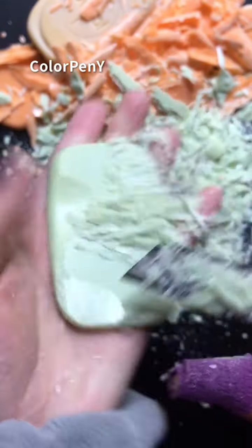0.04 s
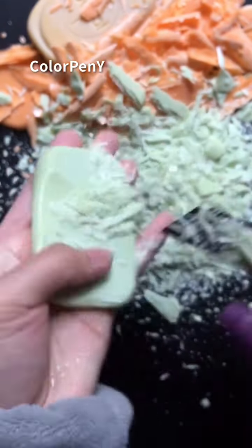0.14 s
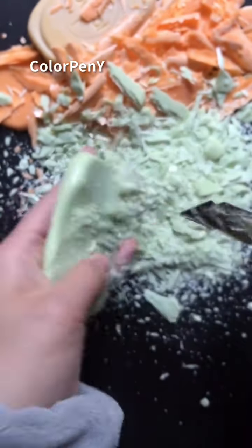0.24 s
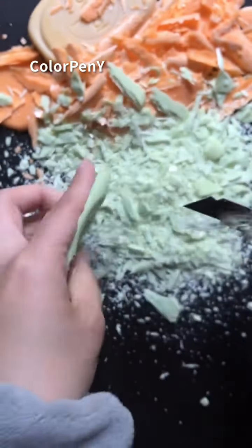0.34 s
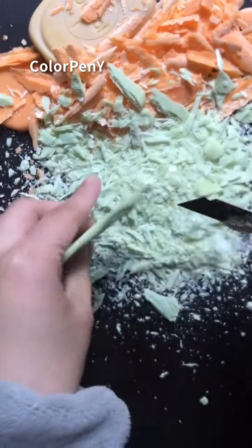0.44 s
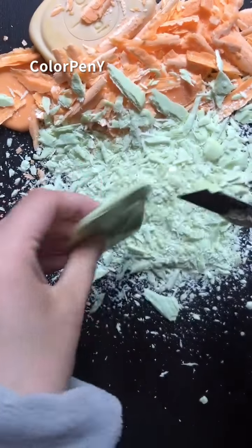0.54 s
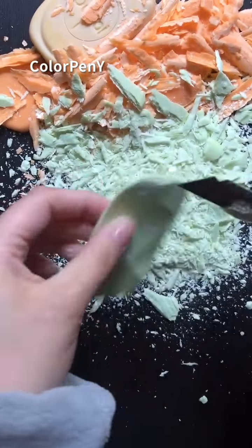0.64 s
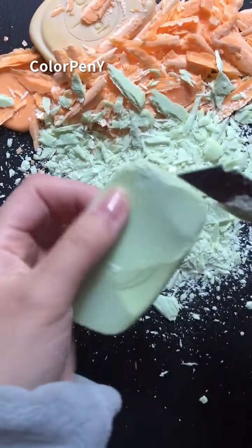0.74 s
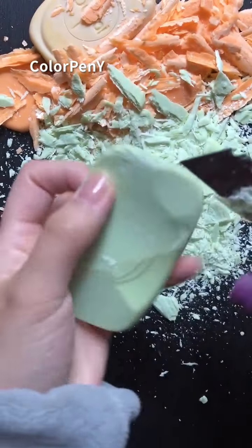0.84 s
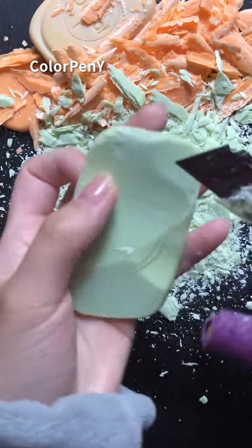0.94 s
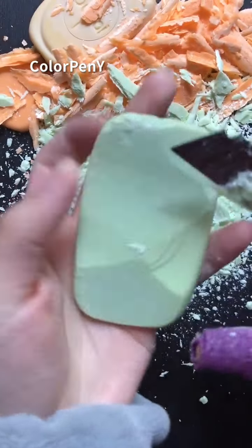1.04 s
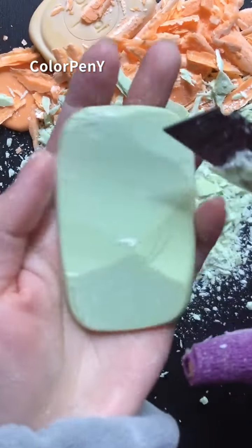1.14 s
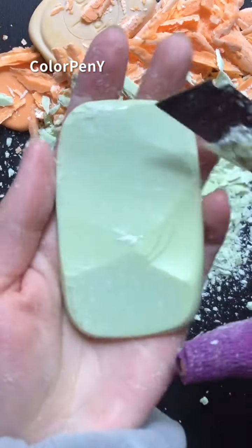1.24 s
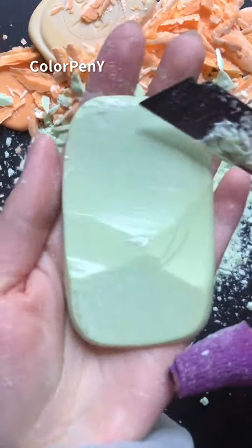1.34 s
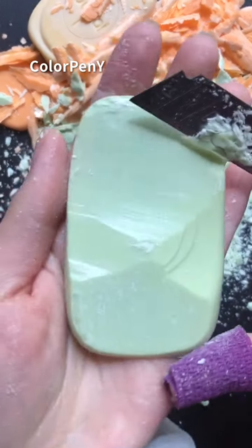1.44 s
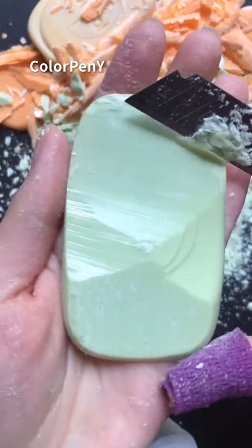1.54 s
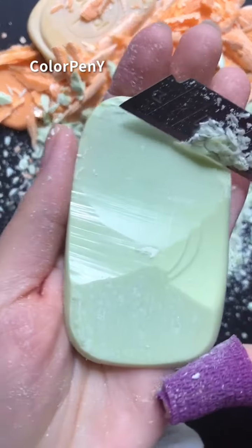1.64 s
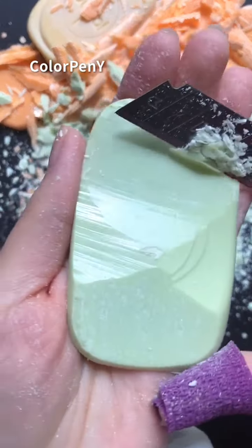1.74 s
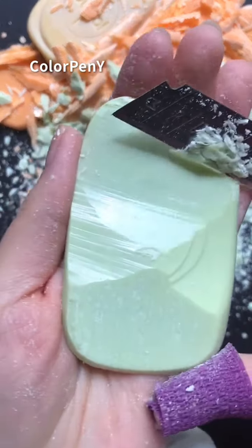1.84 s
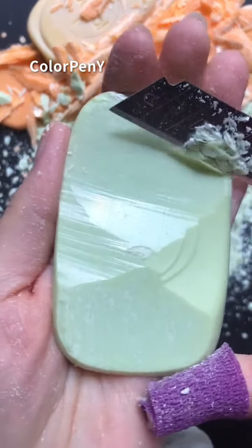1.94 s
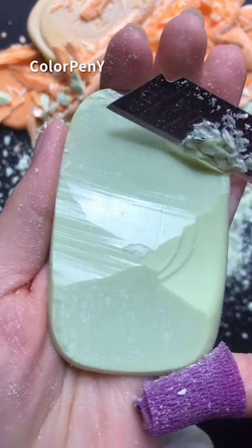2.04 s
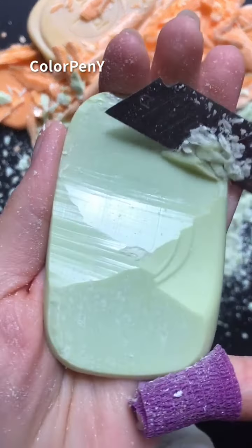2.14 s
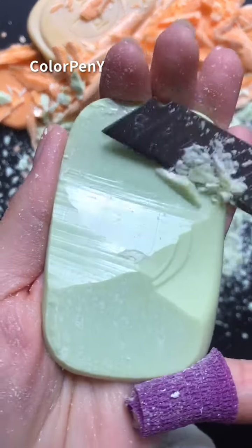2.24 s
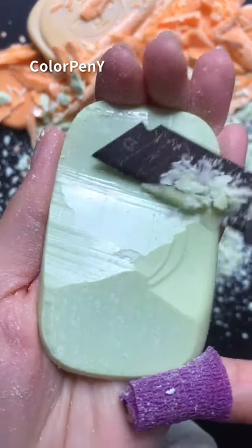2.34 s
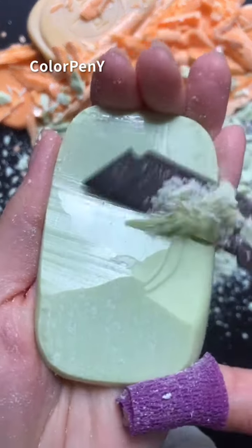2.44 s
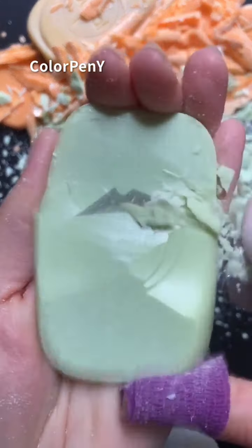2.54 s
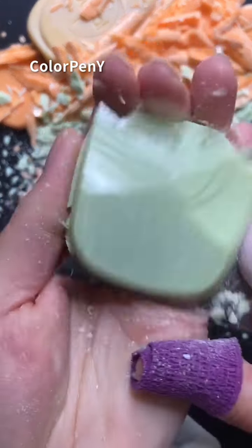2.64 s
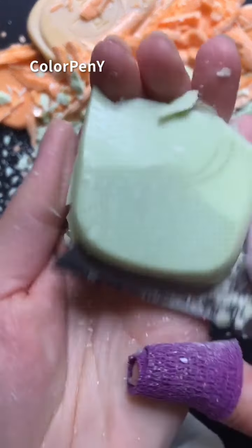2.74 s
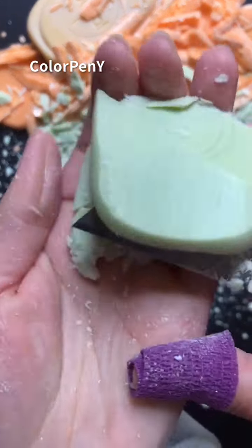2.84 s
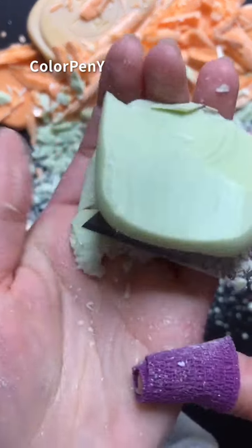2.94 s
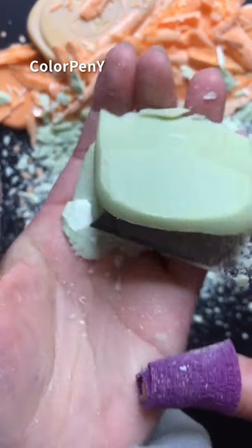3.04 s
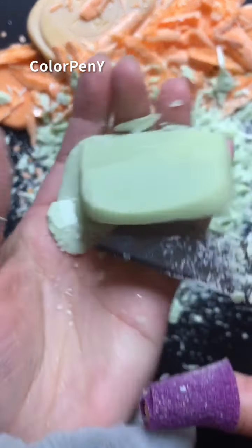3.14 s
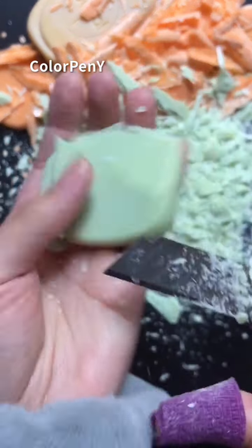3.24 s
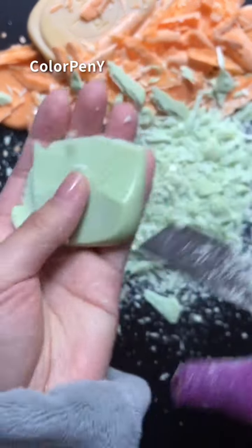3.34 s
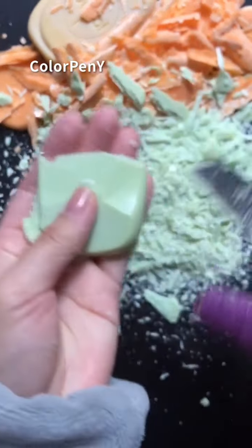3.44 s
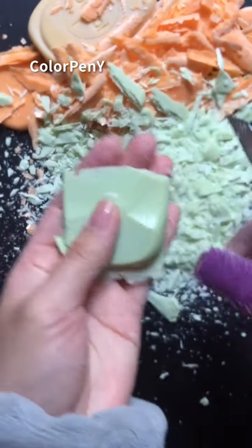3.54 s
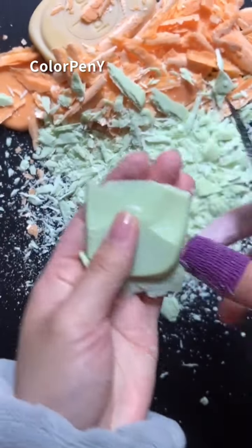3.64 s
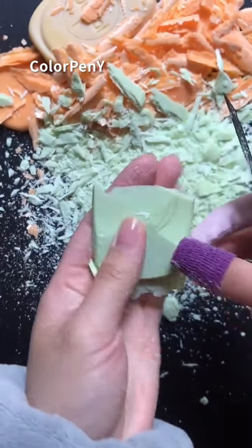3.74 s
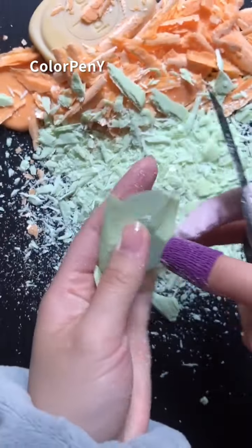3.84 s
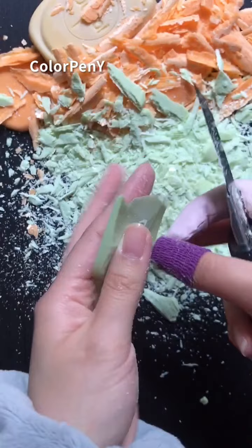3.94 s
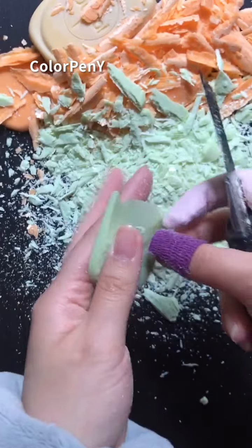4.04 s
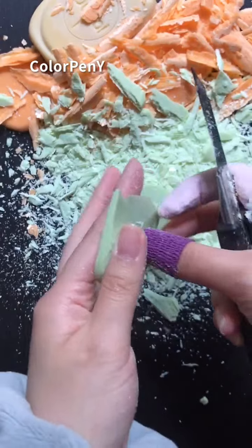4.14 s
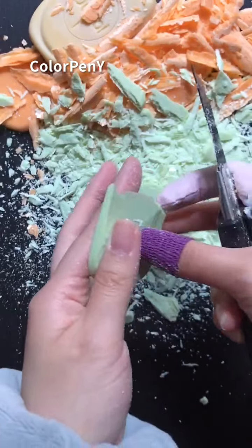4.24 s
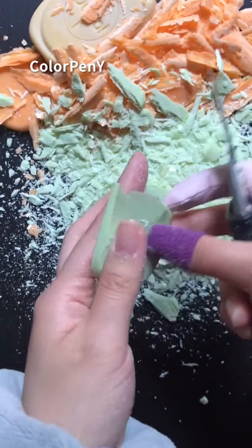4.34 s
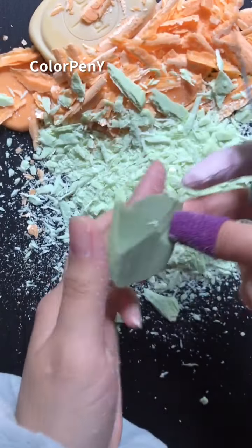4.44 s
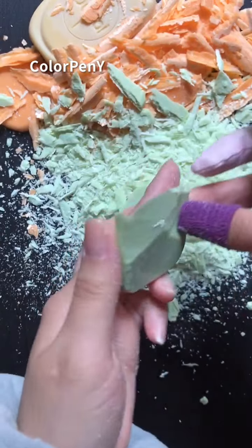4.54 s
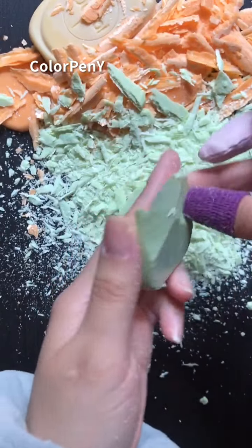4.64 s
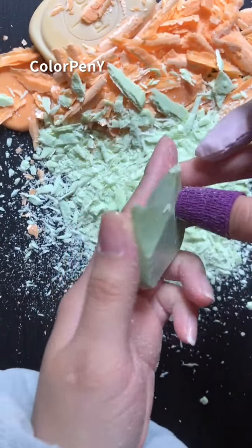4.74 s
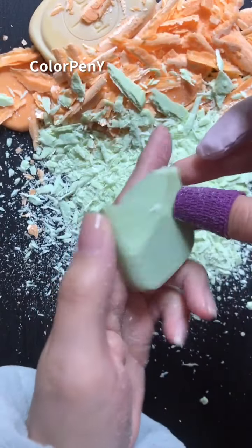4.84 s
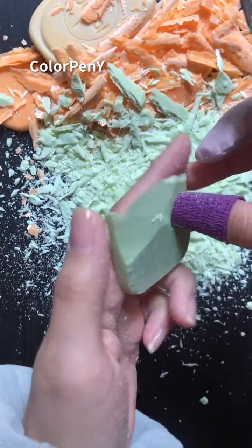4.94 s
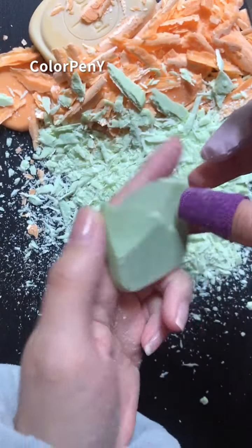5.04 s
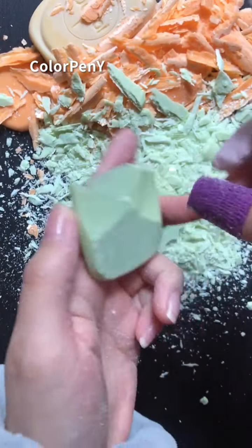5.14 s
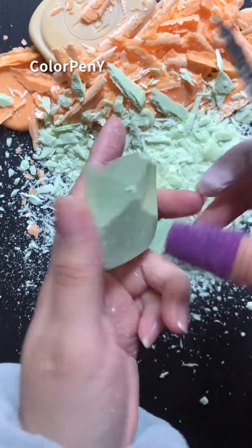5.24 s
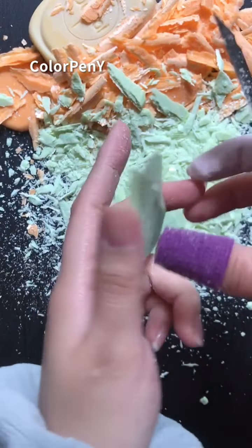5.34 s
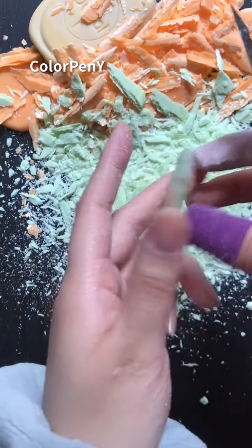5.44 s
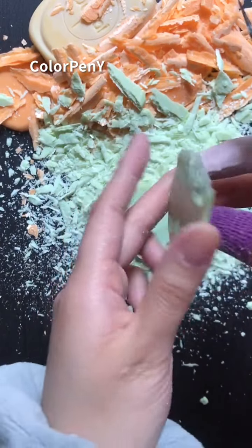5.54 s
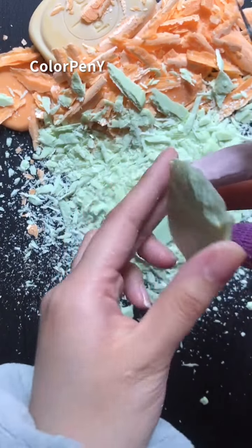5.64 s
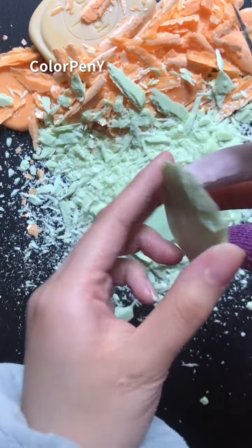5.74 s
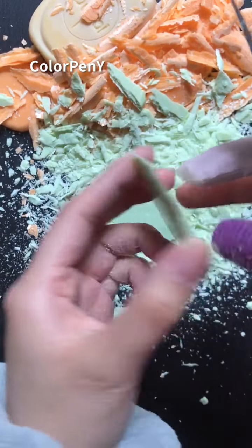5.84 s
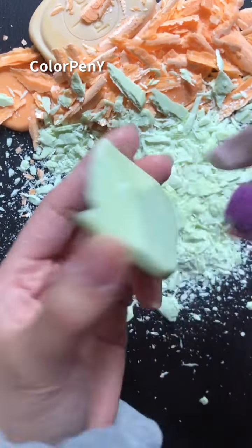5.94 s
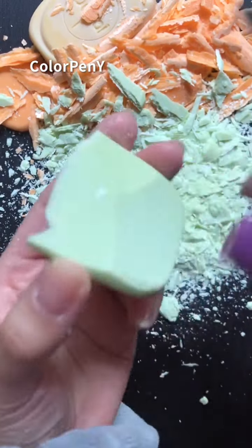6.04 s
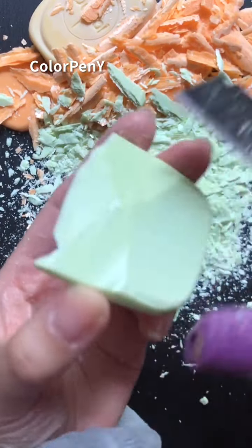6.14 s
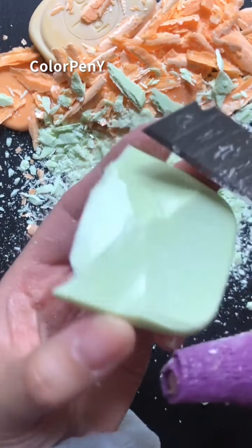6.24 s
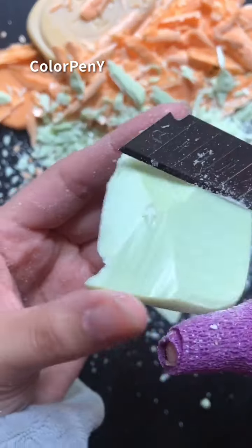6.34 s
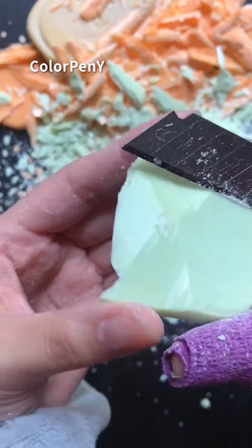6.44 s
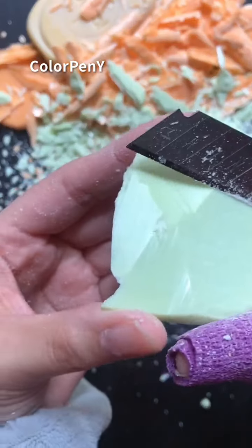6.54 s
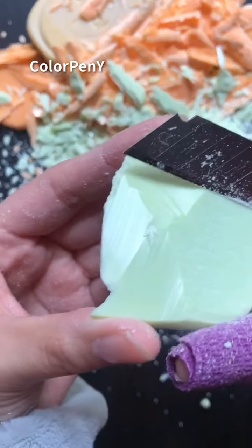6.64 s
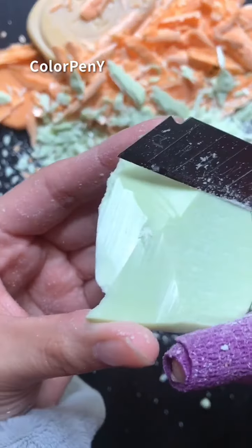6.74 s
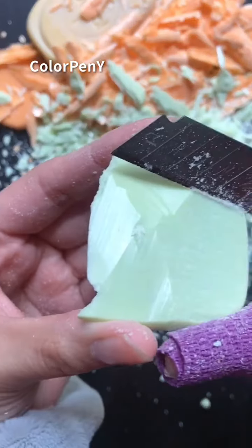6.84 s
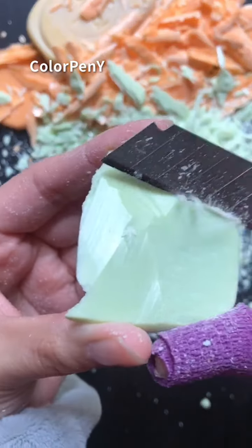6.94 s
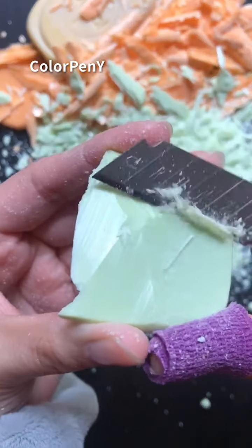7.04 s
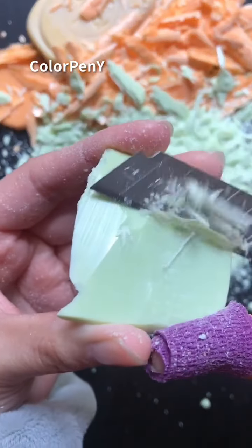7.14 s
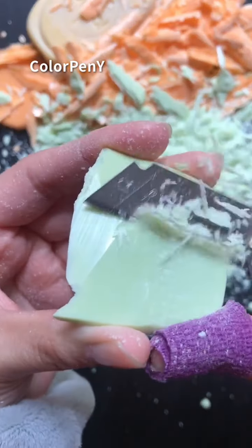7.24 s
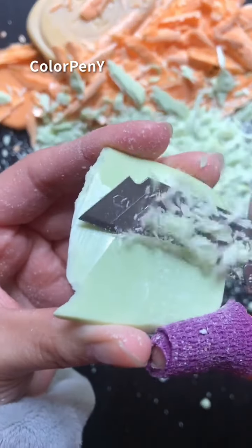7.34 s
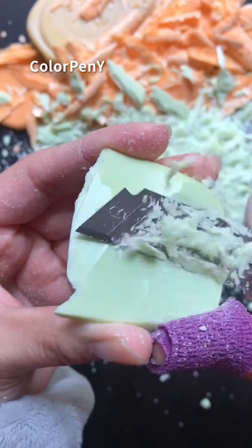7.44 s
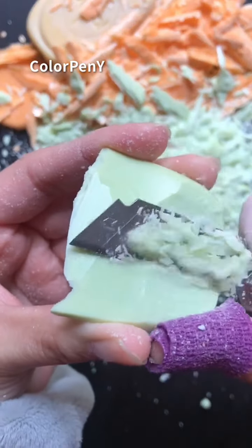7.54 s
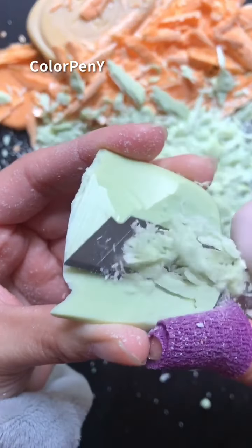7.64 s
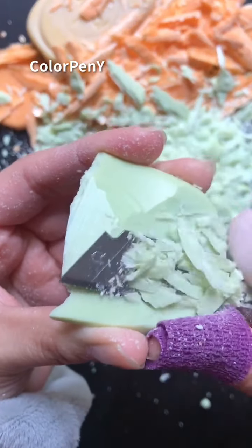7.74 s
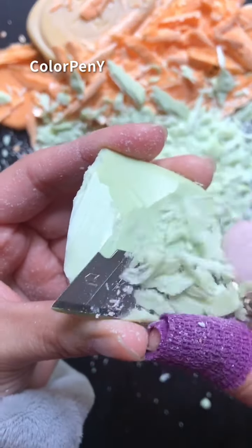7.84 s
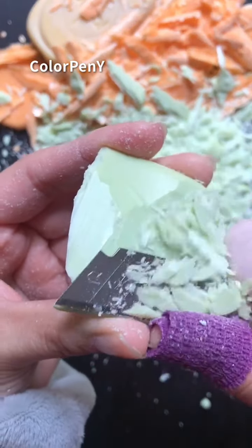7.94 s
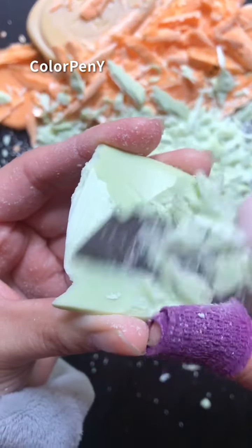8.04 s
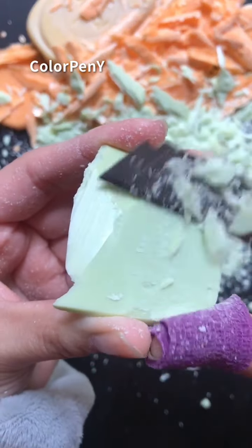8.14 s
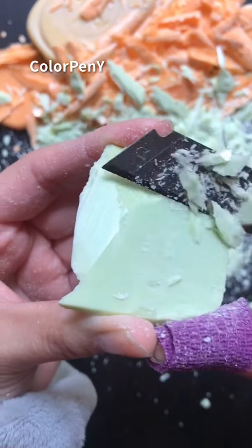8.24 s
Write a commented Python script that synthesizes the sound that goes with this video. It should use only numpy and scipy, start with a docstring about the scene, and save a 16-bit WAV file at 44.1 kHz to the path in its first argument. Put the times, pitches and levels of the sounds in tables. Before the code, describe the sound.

Close microphone over a table heaped with soap shavings. First a soft rain of crumbs with small knocks, then near quiet with faint rubbing. The blade bites through the bar in a crackling, tearing burst rising in pitch. Isolated clicks and hard snaps lead to a dull drop and crunch. Faint finger rustle, a lull, then bright irregular crackles of shaving and a final scuff.

```python
"""At a table heaped with shavings, a dry bar of soap is cut in the hand, heard close up.
Crumbs patter as tiny random grains, and a blade splits the bar in bursts of grains that ring the slab.
Bits snap with one sharp crack, and a chunk drops: the table rings in fading sines and the heap crunches.
Fingers rustle as they turn the bar, and the blade scuffs it in short bursts that ring the steel.
Then the blade shaves the face, each crisp chip a burst that rings the blade, with a jolt of the bar."""
import sys
import numpy as np
from scipy import signal
from scipy.fft import rfft, irfft
from scipy.io import wavfile

SR = 44100
rng = np.random.default_rng(int(sys.argv[2]) if len(sys.argv) > 2 else 0)


def dump_mix(stems):
    """Bounce the given channels to the path in sys.argv[1] as a 16-bit WAV at rate SR."""
    frames = np.atleast_2d(stems).T  # one column per channel
    limited = np.clip(frames, -1, 1)  # hard clip at full scale
    pcm = np.round(limited * 32767).astype(np.int16)
    wavfile.write(sys.argv[1], SR, pcm)


N = 365148
TIME = np.arange(N) / SR  # seconds
GRID = np.maximum(np.fft.rfftfreq(32768, 1 / SR), 1)  # the frequencies, in Hz, at which filters are drawn

# Cracks as the blade splits the bar.
# Each row: time in seconds, level at its height in dB, brightness in dB per octave.
SPLIT_CRACKS = [(2.352, -36, -4), (2.3815, -30.5, -5), (2.4327, -17.5, -3.5), (2.5017, -24.5, -1.5),
                (2.5804, -19, -2.5), (2.5844, -18.5, -2), (2.592, -30, -3.5), (2.623, -28, 1),
                (2.6316, -25, 1), (2.639, -19, -0.5), (2.6437, -13, 2), (2.6635, -18.5, 0.5),
                (2.668, -25.5, -2.5), (2.6772, -37, 5), (2.723, -23.5, -1.5), (2.7275, -10.5, -0.5),
                (2.731, -11, -0.5), (2.7435, -26, 1), (2.752, -36, -2.5), (2.79, -23.5, -2.5),
                (2.795, -30, -0.5), (2.8072, -24.5, 2), (2.823, -32.5, -1), (2.834, -30, -0.5),
                (2.879, -30.5, -0.5)]
# Tone colour of the splitting soap. Each row: frequency in Hz, level in dB.
SPLITTING_COLOUR = [(80, -6.5), (200, -12), (550, -6), (820, -13.5), (1350, -6.5), (1900, -6),
                    (2400, -10.5), (3100, -8.5), (5000, -10), (8300, -8.5), (13800, -12.5), (16000, -18)]
# Tone colour of rubbing on soap. Each row: frequency in Hz, level in dB.
RUBBING_COLOUR = [(200, -3), (700, 2), (1700, -2.5), (2800, -2), (4200, -3.5), (6500, -7), (10000, -15),
                  (15500, -22)]

# The slab holds its first note until the cut runs deep, then rings higher and higher until it comes loose.
SLAB_HZ, LOOSE_HZ = 1642, 2330
DEEP_S, SLAB_RISE_HZ_PER_S2 = 2.62, 22000
OVERTONE_RATIO = 1.79  # the slab's broad overtone, as a multiple of its note


def from_db(db):
    """Turn decibels into a gain."""
    return 10 ** (np.asarray(db) / 20)


def rms_one(x):
    """Scale a sound so that its average strength (rms) is 1."""
    return x / np.sqrt(np.mean(x ** 2) + 1e-20)


def colour(points):
    """Join (Hz, dB) points into a smooth-running tone colour, in dB on the grid."""
    hz, db = np.transpose(points)
    return np.interp(np.log(GRID), np.log(hz), db)


def tilt(brightness):
    """A slope in dB per octave above 1500 Hz, on the grid."""
    return brightness * np.log2(np.maximum(GRID, 1500) / 1500)


def resonance(hz, width_hz, gain_db):
    """A resonant peak standing out of a flat response, in dB on the grid."""
    return 10 * np.log10(1 + from_db(gain_db) ** 2 / (1 + (2 * (GRID - hz) / width_hz) ** 2))


def uneven(depth_db):
    """Every fragment has a shape, and so peaks and dips, of its own: dB on the grid."""
    knots_hz = np.geomspace(300, 16000, 48)
    return depth_db * np.interp(GRID, knots_hz, rng.standard_normal(len(knots_hz)))


def through(x, response_db):
    """Filter a sound so that it reacts as early as the response allows (minimum phase)."""
    cepstrum = irfft(np.log(from_db(response_db)))
    half = len(cepstrum) // 2
    # folding the second half onto the first keeps the filter from sounding ahead of time
    cepstrum[1:half] *= 2
    cepstrum[half + 1:] = 0
    impulse = irfft(np.exp(rfft(cepstrum)))[:half // 2]
    return signal.fftconvolve(x, impulse)[:len(x)]


def add(out, s, sound):
    """Mix a sound in from time s, in seconds."""
    start = round(s * SR)
    sound, start = sound[max(-start, 0):], max(start, 0)
    out[start:start + len(sound)] += sound[:max(N - start, 0)]


def grains(length, per_s, spread_db):
    """Tiny fractures at random moments, many small and a few large; rms 1."""
    luck = rng.random((2, length))
    born = np.flatnonzero(luck[0] < per_s / SR)
    signed = 2 * luck[1, born] - 1
    rarity = np.minimum(-np.log(np.abs(signed) + 1e-9), 3.5)
    out = np.zeros(length)
    out[born] = np.sign(signed) * from_db(spread_db * rarity)
    return rms_one(out)


def swell(rise, fall, shape):
    """Times around a peak, and an envelope that builds up to it and dies away."""
    t = np.arange(-round(4 * rise * SR), round((4 * fall + .02) * SR)) / SR
    return t, np.exp(-np.abs(t / np.where(t < 0, rise, fall)) ** shape)


def burst(s, peak_db, rise, fall, brightness, response_db, per_s, spread_db, crack, shape):
    """An avalanche of tiny fractures, with an optional main crack at its height, sounding through a body."""
    t, envelope = swell(rise, fall, shape)
    force = envelope * grains(len(t), per_s, spread_db)
    force[np.argmax(envelope)] += crack * np.linalg.norm(force)
    sound = through(force, response_db + tilt(brightness) + uneven(depth_db=1))
    return s + t[0], from_db(peak_db) * rms_one(sound) * np.sqrt(np.mean(envelope ** 2))


def crackle(per_s, spread_db, cycles, response_db):
    """Flakes of many sizes, each ticking for a few cycles at its own pitch; rms 1."""
    out = np.zeros(N)
    for hz in np.geomspace(500, 15000, 16):
        b, a = signal.iirpeak(hz, cycles, fs=SR)
        out += signal.lfilter(b, a, grains(N, per_s, spread_db))
    return rms_one(through(out, response_db))


def ticks(per_s, spread_db, decay, response_db):
    """Single crumbs breaking or landing, each a very short puff of grit; rms 1."""
    t = np.arange(SR // 50) / SR
    hits = grains(N, per_s, spread_db) ** 2
    energy = signal.fftconvolve(hits, np.exp(-2 * t / decay))[:N]
    puffs = np.sqrt(np.abs(energy)) * rng.standard_normal(N)
    return rms_one(through(puffs, response_db))


def stutter(per_s, depth_db):
    """Soap grips and lets go irregularly: a gain that lurches about, rms 1."""
    moments = np.cumsum(rng.exponential(1 / per_s, 4000))
    wander_db = depth_db * rng.uniform(-1.9, 1, len(moments))
    return rms_one(from_db(np.interp(TIME, moments, wander_db)))


def stroke(start, attack, hold, release):
    """Gain of one movement, timed in seconds: it builds up, holds and eases off."""
    return np.interp(TIME, start + np.cumsum([0, attack, hold, release]), [0, 1, 1, 0])


def room(x, t60, wet_db, dull_hz):
    """A small furnished room returns a faint, duller tail that fades by 60 dB in t60 seconds."""
    t = np.arange(SR // 2) / SR
    tail = rng.standard_normal(len(t)) * np.exp(-np.log(1000) * t / t60) * (t > .004)
    tail = signal.sosfilt(signal.butter(1, dull_hz, fs=SR, output="sos"), tail)
    return x + from_db(wet_db) * signal.fftconvolve(x, tail / np.linalg.norm(tail))[:N]


def background():
    """Steady room noise, with a narrow low peak that is heard as a wavering drone."""
    # Tone colour of the quiet room. Each row: frequency in Hz, level in dB.
    room_colour = [(15, -43), (25, -18.5), (53, 0.5), (87, -7.5), (145, -10.5), (236, -11.5), (277, -12),
                   (384, -13.5), (503, -19), (695, -19.5), (1940, -29.5), (2110, -28.5), (10700, -38),
                   (13600, -37.5), (16000, -41)]
    drone = resonance(62.4, width_hz=9.6, gain_db=3)
    noise = through(rng.standard_normal(N), colour(room_colour) + drone)
    return from_db(-47) * rms_one(noise)


def handling():
    """Strokes stick and slip with a faint squeak; fingers rustle and loose crumbs patter down."""
    # Light strokes over the soap.
    # Each row: time in seconds, level at its height in dB, rise and fall in seconds, squeak in Hz.
    rubs = [(2.956, -44, 0.022, 3550), (3.33, -50, 0.064, 2600), (4.097, -46.5, 0.0093, 6760),
            (4.124, -41, 0.01, 7500), (4.541, -45, 0.0062, 3500), (5.02, -54.5, .028, 3670),
            (6.232, -50, .015, 2700), (6.97, -54, 0.062, 2400), (7.924, -36.5, 0.02, 14000)]
    # Fingers turning the bar with a faint rustle.
    # Each row: start, attack, hold and release in seconds, level in dB.
    turns = [(0.742, 0.048, 0.089, 0.89, -53.5), (2.772, .2, 0.4, 2.7, -54.5),
             (5.984, 0.039, 0.32, 0.45, -58.5)]
    # Tone colour of loose crumbs. Each row: frequency in Hz, level in dB.
    crumb_colour = [(170, -21), (260, 6), (400, 1), (512, -1.5), (620, -8.5), (950, -6.5), (1800, -16),
                    (2700, -12), (3810, -11), (10400, -15.5), (13500, -12), (16000, -14)]
    # a higher squeak has a brighter hiss: the neutral pitch, and dB per octave gained for each octave above it
    neutral_hz, brightening = 1910, 2.7

    out = np.zeros(N)
    for s, peak_db, span, hz in rubs:
        squeak = colour(RUBBING_COLOUR) + resonance(hz, width_hz=0.12 * hz, gain_db=11) + uneven(depth_db=4)
        brightness = brightening * np.log2(hz / neutral_hz)
        add(out, *burst(s, peak_db, span, span, brightness, squeak,
                        per_s=4600, spread_db=3.5, crack=0, shape=1.8))

    # crumbs slide off the bar and rain on the heap
    crumb_fall = stroke(start=0.02, attack=0.26, hold=0.26, release=0.25)
    turning = sum(from_db(db) * stroke(*movement) for *movement, db in turns)
    shedding = from_db(-45.5) * crumb_fall + turning * stutter(per_s=22, depth_db=1)
    patter = crackle(per_s=400, spread_db=1.5, cycles=1.9, response_db=colour(crumb_colour))
    landing = ticks(per_s=110, spread_db=5.5, decay=0.0013, response_db=colour(crumb_colour) + tilt(-3.3))
    grip = stutter(per_s=140, depth_db=4.5)
    return (out + shedding * patter) * grip + from_db(-49) * crumb_fall * landing


def table():
    """Pieces knock the table and ring its modes, each on another spot; a longer contact sounds duller."""
    # Pieces landing on the table. Each row: time in seconds, strength in dB, contact time in seconds.
    knocks = [(.092, -32.5, 0.0015), (0.1498, -24, 0.00028), (.236, -28.5, 0.0018), (0.268, -33, 0.0025),
              (.341, -30.5, 0.0011), (0.358, -32, 0.0014), (0.45, -29, 0.0022), (.468, -35, .0016),
              (0.487, -31.5, 0.0012), (.632, -34, 0.00096), (2.887, -35.5, 0.00091), (4.095, -37, .0007),
              (4.254, -24.5, 0.00055), (4.279, -10, 0.0035), (4.313, -20.5, 0.0018), (4.407, -34, 0.00035)]
    # Notes the table rings with. Each row: frequency in Hz, level in dB, time to fade by 60 dB in seconds.
    modes = [(86.4, -10, 0.29), (199, -22, 0.61), (226, -18, 0.39), (251.5, -2, 0.084),
             (287.4, -5.5, 0.094), (400, -10, 0.069), (503, -4, 0.047), (717, -2, 0.03), (966, -3, 0.064),
             (1326, -8, 0.076)]

    out, t = np.zeros(N), np.arange(SR // 3) / SR
    hz, mode_db, t60 = np.transpose(modes)[:, :, None]
    fade = np.exp(-np.log(1000) * t / t60)
    for s, knock_db, contact in knocks:
        # each spot stirs the modes by different amounts and shifts their pitches
        luck, detune = rng.standard_normal((2, len(modes), 1))
        strength = from_db(knock_db + mode_db + 2 * luck) / (1 + (hz * contact) ** 2)
        pitch = hz * np.exp(.07 * detune)
        add(out, s, np.sum(strength * np.sin(2 * np.pi * pitch * t) * fade, axis=0))
    return signal.sosfilt(signal.butter(2, 150, "high", fs=SR, output="sos"), out)


def snapping():
    """Brittle bits give one sharp crack with a little grit around it, and ring for an instant."""
    # Hard bits snapping or hitting something.
    # Each row: time in seconds, level at its height in dB, decay in seconds, ring in Hz.
    snaps = [(.1063, -35, .002, 3580), (.13, -32, .003, 1710), (0.1495, -29, .003, 7200),
             (.2685, -36.5, .005, 4000), (.303, -32.5, .002, 5060), (0.3147, -31, 0.0015, 4300),
             (.3391, -30, .001, 4000), (.343, -33, .001, 3000), (.435, -37, .0015, 3170),
             (.4902, -31, .001, 6500), (.5305, -38, .002, 2800), (.5496, -30.5, .0015, 2390),
             (.632, -38, .002, 9100), (.6565, -30, .001, 5870), (3.0005, -28.5, 0.0018, 4340),
             (3.4243, -23, 0.0024, 3000), (3.4345, -9.5, .0013, 3170), (3.4355, -21.5, .002, 690),
             (3.4665, -10, .0015, 3180), (3.538, -36.5, .0034, 8300), (3.6888, -16.5, .001, 2470),
             (3.8312, -27.5, .0033, 14000), (3.909, -31.5, .0025, 3360), (4.1623, -25.5, .0011, 1480),
             (4.255, -16.5, 0.0027, 1320), (4.2632, -12.5, .0042, 3330), (4.299, -29, .0015, 2000),
             (4.311, -20.5, .0044, 3100), (4.408, -39, .0018, 1070), (5.598, -31.5, 0.0015, 2680),
             (7.3155, -31, .002, 14000), (7.4716, -23.5, 0.0006, 7000), (7.779, -33, .002, 3900),
             (7.855, -32, .0008, 7200), (8.077, -28, .001, 5040), (8.0795, -27, .0011, 3300),
             (8.1938, -20.5, .002, 3400)]
    # Tone colour of the snaps. Each row: frequency in Hz, level in dB.
    snap_colour = [(150, -9), (400, -3), (700, -3.5), (1450, -8), (2200, -8), (3100, -3), (4500, -3),
                   (6000, -4), (9000, -9.5), (15500, -12.5)]
    # smaller bits ring higher and sound brighter:
    # the pitch of a neutral bit, and dB per octave gained for each octave above it
    neutral_hz, brightening = 3100, 4.3

    out = np.zeros(N)
    for s, peak_db, decay, hz in snaps:
        ring = resonance(hz, width_hz=0.26 * hz, gain_db=9.5)
        overtone = resonance(1.375 * hz, width_hz=0.34 * hz, gain_db=1.5)
        brightness = brightening * np.log2(hz / neutral_hz)
        add(out, *burst(s, peak_db, .0005, decay, brightness, colour(snap_colour) + ring + overtone,
                        per_s=12000, spread_db=3.5, crack=1, shape=0.79))
    return out


def scuffing():
    """The blade skids over the soap in short, uneven catches that ring its modes."""
    # The blade scuffing over the bar. Each row: time in seconds, level at its height in dB,
    # rise and fall in seconds, brightness in dB per octave, lowest note of the blade in Hz.
    scuffs = [(1.189, -44, .011, -3, 1710), (1.22, -42, .016, -1.5, 1660), (1.888, -49, 0.014, -7, 1790),
              (8.153, -36, 0.018, 4, 1850), (8.1862, -23, 0.002, 2.5, 1870), (8.197, -29, .024, 2, 1840)]
    # Notes of the scuffing blade. Each row: multiple of its lowest note, height of the peak in dB.
    blade_modes = [(1, 12.5), (1.56, 2), (1.87, 4.5), (2.44, 10), (3.6, 5)]

    out = np.zeros(N)
    for s, peak_db, span, brightness, hz in scuffs:
        steel = sum(resonance(ratio * hz, width_hz=80 * ratio, gain_db=db) for ratio, db in blade_modes)
        add(out, *burst(s, peak_db, span, span, brightness, colour(RUBBING_COLOUR) + steel,
                        per_s=2500, spread_db=3.5, crack=0, shape=1.17))
    return out * stutter(per_s=250, depth_db=-1)


def slab_hz(s):
    """The note of the slab at time s, which climbs as the cut runs deep."""
    climb = SLAB_RISE_HZ_PER_S2 * np.maximum(s - DEEP_S, 0) ** 2
    return np.clip(SLAB_HZ + climb, SLAB_HZ, LOOSE_HZ)


def surge():
    """The blade lurches on at each crack: dB of extra drag."""
    out = np.zeros(N)
    t, lurch = swell(rise=.003, fall=.014, shape=1)
    for s, _, _ in SPLIT_CRACKS:
        add(out, s + t[0], lurch)
    return 7.5 * np.minimum(out, 1)


def splitting():
    """Cracks run ahead of the blade and ring the slab, which also sings under the steel as the soap tears."""
    # a crack builds up and dies away; this much extra brightness, in dB per octave, halves its length
    rise_s, fall_s, halving = .0021, .0035, 8
    out, singing = np.zeros(N), np.zeros(N)
    for s, peak_db, brightness in SPLIT_CRACKS:
        # the note shifts a little from crack to crack
        note = slab_hz(s) * np.exp(0.0099 * rng.standard_normal())
        slab = resonance(note, width_hz=85 * (note / SLAB_HZ) ** 4, gain_db=15.5)
        slab += resonance(OVERTONE_RATIO * note, width_hz=920, gain_db=5.5)
        body = colour(SPLITTING_COLOUR) + slab + uneven(depth_db=1.6)
        length = 2 ** (-brightness / halving)
        add(out, *burst(s, peak_db, rise_s * length, fall_s * length, brightness, body,
                        per_s=10000, spread_db=3, crack=0.26, shape=1.5))

    # the singing fades from one fixed pitch to the next as the slab's note climbs
    friction = crackle(per_s=840, spread_db=8.5, cycles=3.3, response_db=colour(SPLITTING_COLOUR))
    pitches = np.linspace(SLAB_HZ, LOOSE_HZ, 5)
    for share, hz in zip(np.eye(len(pitches)), pitches):
        # the loosening slab is damped more, so its note broadens as it rises
        squeak = resonance(hz, width_hz=220 * (hz / SLAB_HZ) ** 3, gain_db=18)
        squeak += resonance(OVERTONE_RATIO * hz, width_hz=900, gain_db=9)
        singing += np.interp(slab_hz(TIME), pitches, share) * rms_one(through(friction, squeak))
    drag = from_db(-49 + surge()) * stroke(start=2.223, attack=0.15, hold=0.48, release=0.072)

    # the cut tears open with a bright hiss once it runs deep
    hiss = crackle(per_s=2100, spread_db=5, cycles=4.4, response_db=colour(SPLITTING_COLOUR) + tilt(2.3))
    tear = from_db(-47.5) * stroke(start=2.517, attack=0.088, hold=0.25, release=0.076)
    return out + stutter(per_s=110, depth_db=3) * (drag * singing + tear * hiss)


def ripping():
    """The last thin webs of soap tear in dense, high-pitched spurts."""
    # Thin webs of soap ripping in the cut.
    # Each row: time in seconds, level at its height in dB, rise and fall in seconds, pitch in Hz.
    rips = [(2.622, -17.5, .002, 8300), (2.632, -24.5, 0.0066, 9200), (2.668, -25, 0.0058, 13500),
            (2.807, -16, 0.0019, 7300)]
    out = np.zeros(N)
    for s, peak_db, span, hz in rips:
        web = colour(SPLITTING_COLOUR) + resonance(hz, width_hz=1500, gain_db=16.5) + uneven(depth_db=1)
        add(out, *burst(s, peak_db, span, span, 4, web, per_s=7000, spread_db=7, crack=0, shape=1.5))
    return out


def heap():
    """The dropped chunk crushes the shavings in dense crunches."""
    # The chunk scatters the heap, then topples. Each row: time in seconds, level at its height in dB,
    # rise in seconds, fall in seconds, brightness in dB per octave.
    scatters = [(4.272, -28, .011, .033, 1), (4.409, -37, .002, .012, -10)]
    # Tone colour of the heaped shavings. Each row: frequency in Hz, level in dB.
    heap_colour = [(200, -10.5), (600, -3.5), (1350, 2), (2000, -2.5), (3500, -6.5), (5000, -7.5),
                   (6600, -5), (8200, -18), (10500, -28), (15500, -19)]
    out = np.zeros(N)
    for scatter in scatters:
        add(out, *burst(*scatter, colour(heap_colour), per_s=4000, spread_db=4, crack=0, shape=1.03))
    return out


def shaving():
    """Each chip rings the thin blade and, as it lets go, jolts the bar; small crumbs break in between."""
    # Chips breaking off under the shaving blade. Each row: time in seconds, level at its height in dB,
    # brightness in dB per octave, ring of the blade in Hz.
    chips = [(7.04, -31, -6, 7500), (7.097, -25.5, -4.5, 7200), (7.1069, -28, -5.5, 7000),
             (7.134, -26.5, -4.5, 7100), (7.2333, -17.5, -4, 6930), (7.294, -34, -1.5, 7300),
             (7.361, -22.5, -1.5, 6800), (7.3972, -25, -2, 6800), (7.4357, -28, -3, 7400),
             (7.5303, -28.5, -2, 7400), (7.6363, -25, 0, 6820), (7.6912, -33.5, 0.5, 6840),
             (7.7119, -14.5, 0, 6860), (7.79, -32, -1.5, 6450), (7.812, -36.5, 1, 6720),
             (7.875, -22, 0, 7200), (7.906, -25.5, -0.5, 7450)]
    # Tone colour of the breaking chips. Each row: frequency in Hz, level in dB.
    chip_colour = [(100, -12.5), (250, 7), (500, -4), (1000, -6.5), (2000, -6), (3300, -4), (4400, -4),
                   (5300, -6.5), (7000, 0.5), (8500, -5.5), (10000, -5.5), (12000, -8.5), (15500, -5.5)]
    # a chip of middling level rises and falls in these times;
    # strong ones snap quicker, weak ones crumble (this many dB more halves the length)
    middling_db, rise_s, fall_s, halving_db = -27, .0028, .0032, 15
    jolt_lag_s = 0.00324  # the bar jolts this long after a chip lets go

    out, jolts = np.zeros(N), np.zeros(N)
    t, push = swell(rise=0.00083, fall=0.00058, shape=0.89)
    for s, peak_db, brightness, hz in chips:
        length = 2 ** ((middling_db - peak_db) / halving_db)
        chip = colour(chip_colour) + resonance(hz, width_hz=380, gain_db=6.5) + uneven(depth_db=2)
        add(out, *burst(s, peak_db, rise_s * length, fall_s * length, brightness, chip,
                        per_s=12000, spread_db=4, crack=0.063, shape=0.95))
        add(jolts, s + jolt_lag_s + t[0], -from_db(peak_db) * push)
    jolts = signal.sosfilt(signal.butter(1, [110, 380], "band", fs=SR, output="sos"), jolts)

    # the blade scratches along the face, and small crumbs break between the chips
    blade = colour(chip_colour) + resonance(7160, width_hz=1200, gain_db=7)
    scratch = ticks(per_s=700, spread_db=5.5, decay=.0006, response_db=blade + tilt(-0.55))
    crumbs = ticks(per_s=340, spread_db=3.5, decay=0.00078, response_db=blade + tilt(-2.3))
    grit = from_db(-46.5) * stroke(start=7.22, attack=0.037, hold=0.2, release=0.16) * scratch
    grit += from_db(-50.5) * stroke(start=7.2, attack=0.075, hold=0.78, release=0.24) * crumbs
    return out + jolts + stutter(per_s=50, depth_db=8.5) * grit


def scene():
    """All the work of the hands, in the room; the heap lies further off and its crunch rings on longer."""
    in_hand = handling() + snapping() + scuffing() + splitting() + ripping() + shaving()
    close = room(in_hand, t60=0.092, wet_db=-16.5, dull_hz=7040)
    below = table() + room(heap(), t60=0.62, wet_db=-14, dull_hz=1500)
    # the level of everything dips almost to silence for an instant
    hush_s, hush_width_s, hush_db = 6.425, 0.028, -38.5
    hush = from_db(hush_db * np.exp(-((TIME - hush_s) / hush_width_s) ** 2))
    return (background() + close + below)[None] * hush


def record(dry):
    """The highest peaks are rounded and everything above 15800 Hz is cut."""
    rounded = 0.91 * np.tanh(dry / 0.89)
    return signal.sosfilt(signal.ellip(10, .2, 80, 15800, fs=SR, output="sos"), rounded)


dry = scene()
out = record(dry)
dump_mix(out)
```